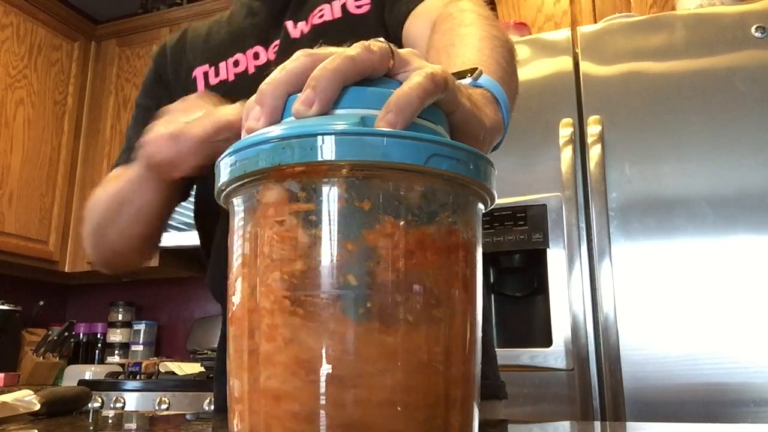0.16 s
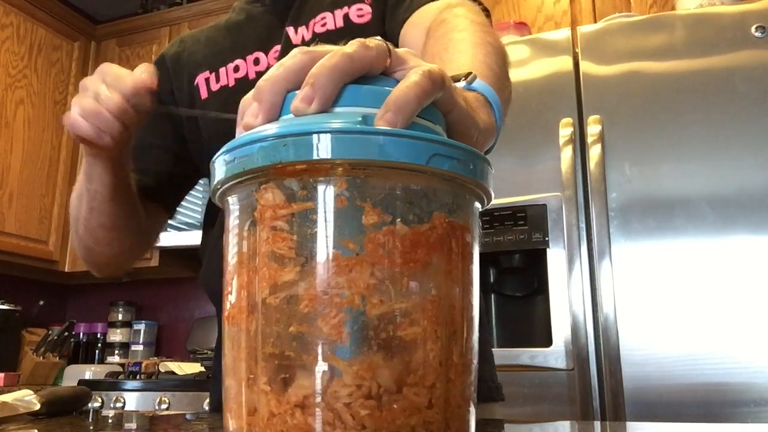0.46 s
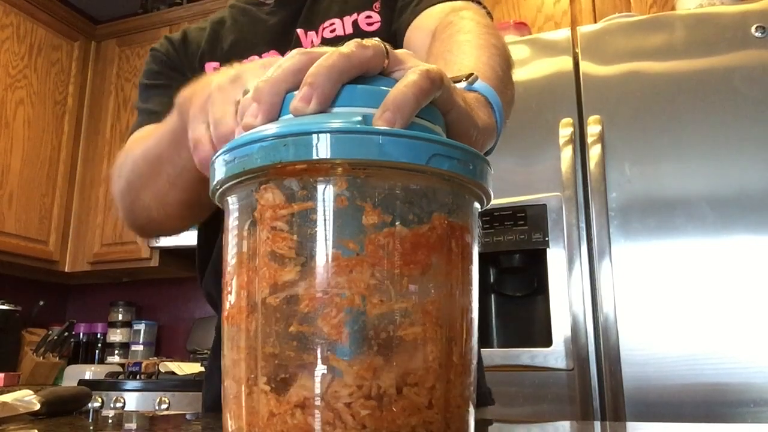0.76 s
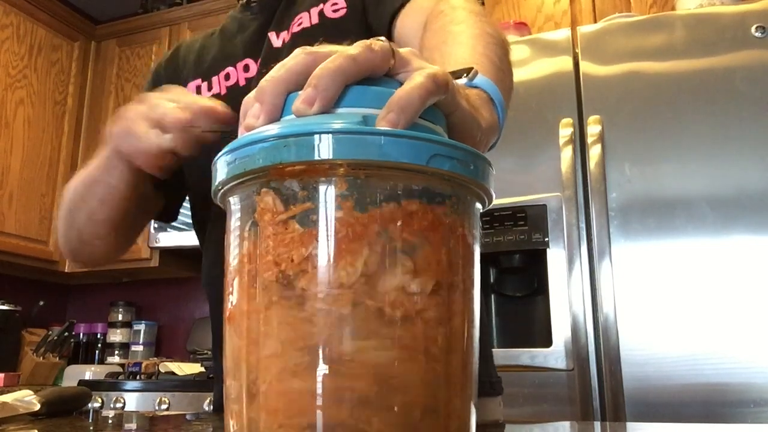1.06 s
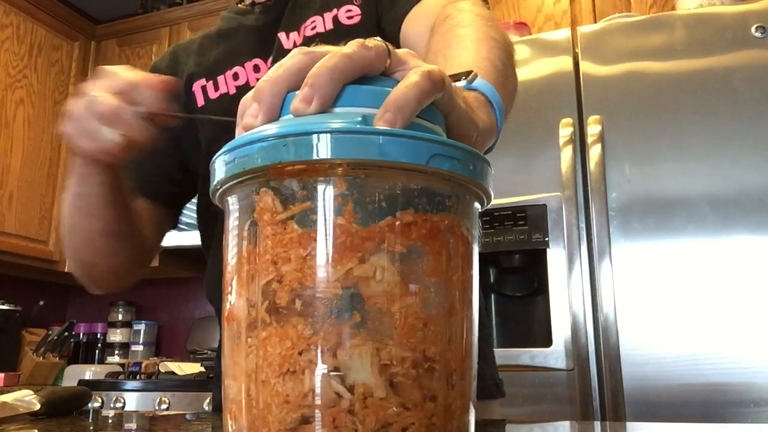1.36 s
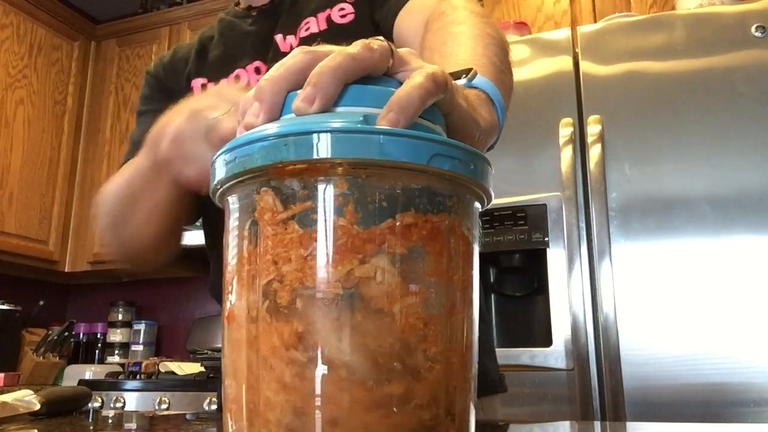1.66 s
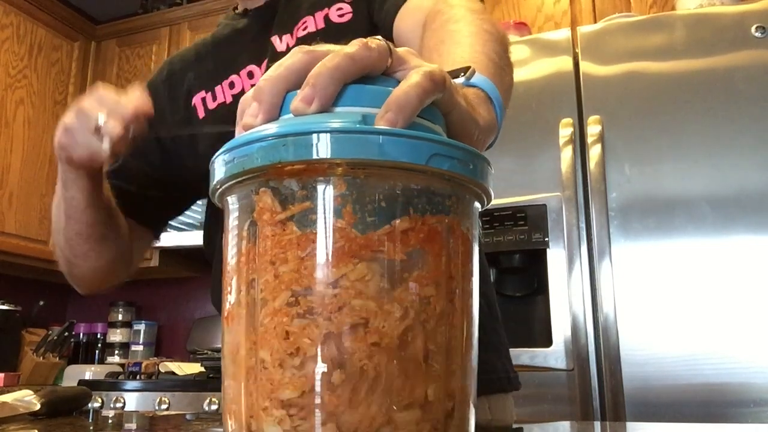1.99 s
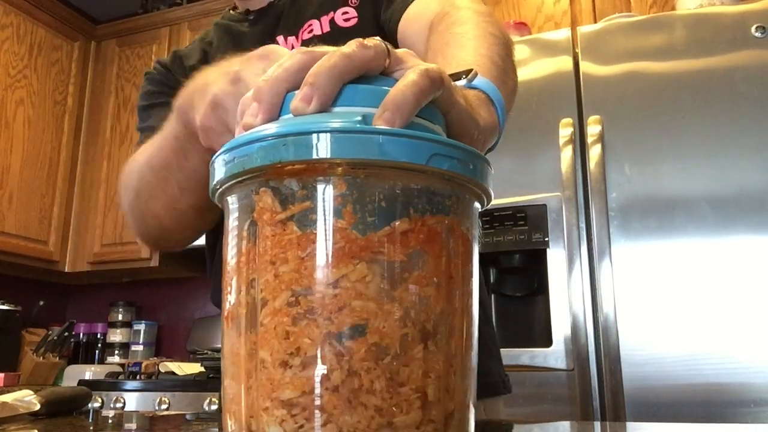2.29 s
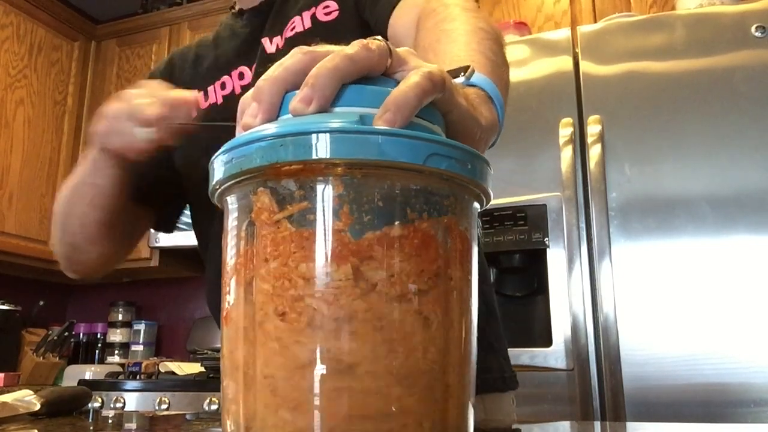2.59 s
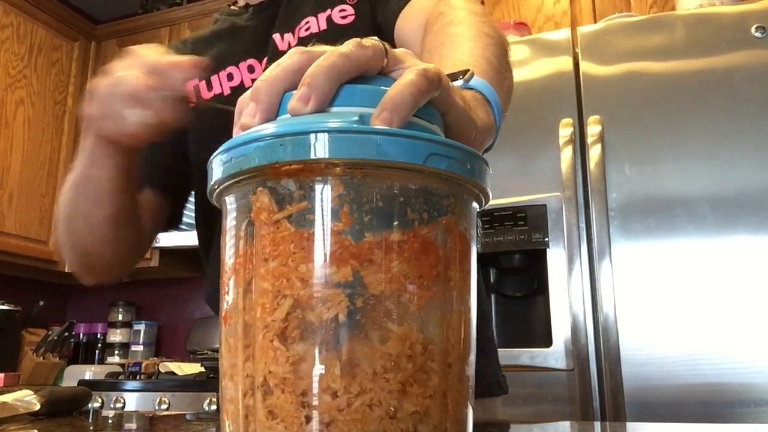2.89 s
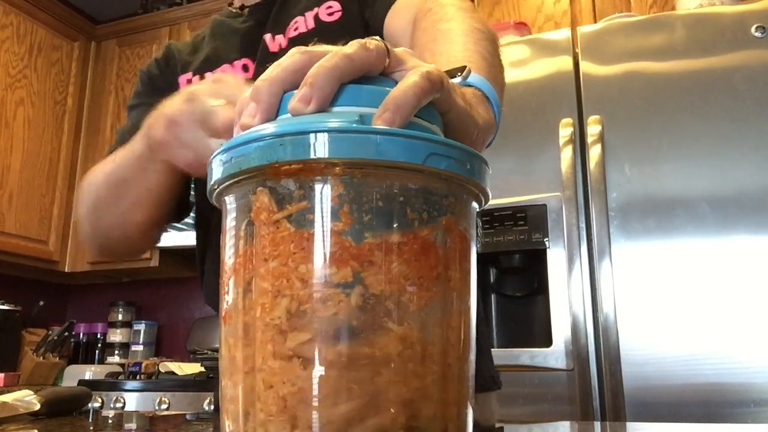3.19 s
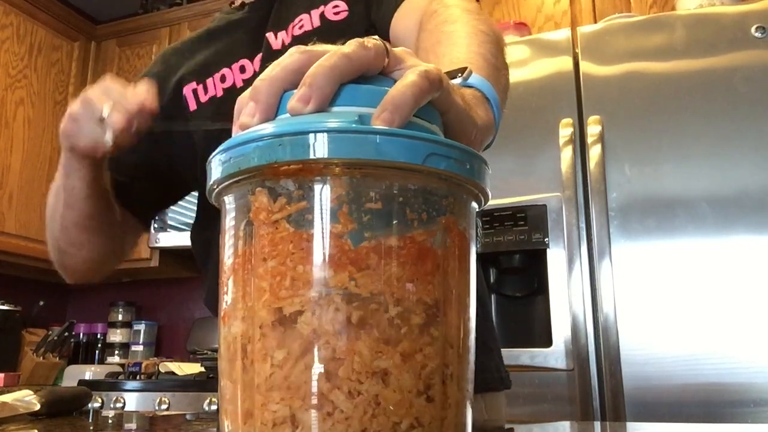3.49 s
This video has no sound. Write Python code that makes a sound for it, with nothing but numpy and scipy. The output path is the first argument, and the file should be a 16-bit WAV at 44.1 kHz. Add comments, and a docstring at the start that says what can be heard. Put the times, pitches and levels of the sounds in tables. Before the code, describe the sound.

A pull-cord food chopper, close to a phone microphone in a quiet kitchen. Pulls begin near 0.04, 0.9, 1.7, 2.4 and 3.2 seconds: a clutch snap, then gritty grinding swelling with crunches and dull thuds in the jar. Around 0.53, 1.36, 2.1, 2.86 and 3.6 the cord rewinds with hollow, bright lid rattling and sharp knocks; the last is cut short. A soft counter bump falls near 0.97.

```python
"""Pull-cord food chopper

A chopper on a kitchen counter, close to a phone microphone, over quiet room tone: five pulls and five returns.
Each pull: the clutch snaps in, gears grind and blades beat the food round the plastic jar, as random clicks
filtered by the jar. Each return: the spring rewinds the cord and the lid rattles and knocks, as chattering
noise that rings the lid. Once the jar bumps the counter, a short decaying sine."""
import sys
import numpy as np
from scipy import signal
from scipy.fft import rfft, irfft
from scipy.io import wavfile
from scipy.ndimage import uniform_filter1d

SR = 44100
rng = np.random.default_rng(int(sys.argv[2]) if len(sys.argv) > 2 else 0)


def int16_out(signal):
    """Quantize to a 16-bit WAV file."""
    q = np.round(np.clip(np.atleast_2d(signal).T, -1, 1) * 32767)
    wavfile.write(sys.argv[1], SR, q.astype(np.int16))


N = 160965  # length [samples]

# ringing of jar and lid; widths and lifts are base values that body() and lid() adapt:
# (frequency [Hz], width [Hz], lift while pulling [dB], lift while rattling [dB])
MODES = [(221, 45, 6.5, -3.5), (1060, 300, 5.5, 4.5), (1205, 260, 8.5, 3.5), (1694, 153, 4, 8),
         (1993, 91, 6, 8.5), (2555, 270, 3, 5), (3000, 97, 2.5, 5.5), (4580, 62, 5.5, 3),
         (5510, 450, 6.5, 8), (6160, 380, 3.5, 3.5), (6760, 140, 0, 7.5)]
CREST_DB = 12  # nominal peak of a chattering blow over its rms


def undb(db):
    """Decibels to amplitude ratio."""
    return 10 ** (np.asarray(db) / 20)


def unit(x):
    """Scale to an rms of 1."""
    return x / np.sqrt(np.mean(x ** 2))


def body(x, colour, lifts):
    """Causal minimum-phase filter with the given colour, raised at each mode; negative lifts count as none."""
    size = 8192
    half = size // 2
    hz = np.maximum(np.arange(half + 1) * SR / size, 1)
    colour_hz, colour_db = np.array(colour).T
    db = np.interp(np.log(hz), np.log(colour_hz), colour_db)
    for f, width, lift_db in lifts:
        db = db + max(lift_db, 0) / (1 + (2 * (hz - f) / max(width, 55)) ** 2)  # at least 55 Hz wide
    # folding the cepstrum forward in time makes the filter minimum-phase
    cepstrum = irfft(np.log(undb(db)))
    cepstrum[1:half] *= 2
    cepstrum[half + 1:] = 0
    impulse = irfft(np.exp(rfft(cepstrum)))[:half]
    return signal.fftconvolve(x, impulse)[:N]


def band(x, lo_hz, hi_hz):
    """Keep one frequency band."""
    return signal.sosfilt(signal.butter(2, [lo_hz, hi_hz], "bandpass", fs=SR, output="sos"), x)


def clicks(rate, spread_db, smooth):
    """Random clicks of uneven size, at a mean rate per second, over a share of smooth rubbing."""
    chance, size = rng.random(N), rng.exponential(size=N)
    sign_noise, rubbing = rng.standard_normal((2, N))
    hits = (chance < rate / SR) * undb(spread_db * np.minimum(size, 3)) * np.sign(sign_noise)
    return unit(unit(hits) + smooth * rubbing)


def flutter(rate, depth_db):
    """Quick uneven swelling: random steps in dB at the given rate per second, smoothed into a gain."""
    k = max(int(SR / rate), 1)
    steps = np.repeat(np.clip(rng.standard_normal(N // 50), -2, 2), k)[:N]
    return unit(undb(depth_db * uniform_filter1d(steps, k)))


def patchy(x, rate, depth_db):
    """The colour shifts from grain to grain: frequency bands swell apart from each other."""
    edges = [30, 300, 700, 1500, 3000, 4500, 6200, 8000, 19000]  # Hz
    total = 0
    for k, (lo_hz, hi_hz) in enumerate(zip(edges[:-1], edges[1:])):
        total = total + (-1) ** k * band(x, lo_hz, hi_hz) * flutter(rate, depth_db)
    return unit(total)


def ticking():
    """Gain of many small loose ticks, each quickly swelling and dying, over steady rubbing."""
    ticks_per_s, tail_s, spread_db, rub_share = 280, .0007, 4.5, .65
    chance, size = rng.random(N), rng.standard_normal(N)
    hits = (chance < ticks_per_s / SR) * undb(spread_db * np.clip(size, -2, 2))
    fade = np.exp(-1 / (tail_s * SR))
    ticks = signal.lfilter([1], [1, -2 * fade, fade ** 2], hits)
    return unit(unit(ticks) + rub_share)


def curve(tables, column):
    """Gain over time from several stretches, silent between them, with 8 ms fades outside their ends."""
    t, out = np.arange(N) / SR, np.zeros(N)
    for rows in tables:
        rows = np.array(rows)
        edge = np.clip(np.minimum(t - rows[0, 0], rows[-1, 0] - t) / .008 + 1, 0, 1)
        out += edge * undb(np.interp(t, rows[:, 0], rows[:, column]))
    return out


def bursts(rows, length, rise_s, tail_s):
    """Gain of blows (time [s], level [dB]): each rises, holds for its length [s], then dies away."""
    t, out = np.arange(N) / SR, np.zeros(N)
    for (s, db), hold in zip(rows, np.broadcast_to(length, len(rows))):
        i = int(s * SR)
        dt = t[i:i + 4000] - s
        rise = np.clip(dt / rise_s, 0, 1)
        decay = np.exp(-np.maximum(dt - rise_s - hold, 0) / tail_s)
        out[i:i + 4000] += undb(db) * rise * decay
    return out


def room_tone():
    """Steady background of the kitchen: noise filtered to the colour of the room."""
    # shape of the room tone: (frequency [Hz], level [dB])
    tone_colour = [(18, -30), (40, -17.5), (102, -3.5), (463, -8.5), (702, -14.5), (1990, -20), (6000, -31),
                   (9000, -40), (15200, -59)]
    level_db = -38  # rms ahead of the microphone
    return undb(level_db) * unit(body(rng.standard_normal(N), tone_colour, []))


def room_echo(near):
    """Reflections of the kitchen: band-limited noise dying exponentially, starting after 4 ms."""
    level_db, t60_s, low_hz, damp_hz = -17, .25, 126, 4560
    t = np.arange(SR // 2) / SR
    tail = rng.standard_normal(len(t)) * undb(-60 * t / t60_s) * (t > .004)
    tail = band(tail, low_hz, damp_hz)
    wet = signal.fftconvolve(near, tail / np.sqrt(np.sum(tail ** 2)))[:N]
    return undb(level_db) * wet


def bumps():
    """The jar bumps the counter: a short dull thump, a low sine that swells and dies."""
    # bumps, levels ahead of the scaling below: (time [s], level [dB])
    bump_rows = [(0.9674, -10)]
    pitch_hz, swell_s = 161, 0.002
    t, out = np.arange(N) / SR, np.zeros(N)
    for s, db in bump_rows:
        age = np.maximum(t - s, 0) / swell_s
        out += undb(db) * 2.2 * age * np.exp(-age) * np.sin(2 * np.pi * pitch_hz * (t - s))
    return out


def lid(hollow, bright, colour, lifts, favour):
    """The lid rings: a hollow lower part, and a bright upper part whose modes depend on the spot struck."""
    split_hz, top_hz, spots_per_s = 2500, 19000, 110

    def low(x):
        return band(body(x, colour, lifts), 55, split_hz)

    def high(x, modes):
        return -band(body(x, colour, modes), split_hz, top_hz)

    # the struck spot wanders among three
    spots = np.array([flutter(spots_per_s, 8) for _ in range(3)])
    spots = spots / np.sum(spots, axis=0)
    even = rng.standard_normal(N)  # plain noise, sets the level of each part
    upper = 0
    for k, spot in enumerate(spots):
        # each spot scales the lift of every third mode by favour and divides the others by it
        modes = [(f, 2 * width, db * (favour if j % 3 == k else 1 / favour))
                 for j, (f, width, db) in enumerate(lifts)]
        upper = upper + high(bright * spot, modes)
    return low(hollow) / np.std(low(even)) + upper / np.std(high(even, lifts))


def blows(rows, length, rise_s, tail_s, lead_s, linger):
    """Chatter driving the hollow and bright parts of the lid; the hollow part swells in earlier by lead_s."""
    rows = np.array(rows)
    chatter = undb(-CREST_DB) * patchy(clicks(3000, 0.78, 0.78), 300, 6.0)
    hollow = np.c_[rows[:, 0] - lead_s, rows[:, 1] + rows[:, 2]]
    hollow_gain = bursts(hollow, length, rise_s + lead_s, tail_s * linger)
    bright_gain = bursts(rows[:, :2], length, rise_s, tail_s)
    return chatter * hollow_gain, chatter * bright_gain


def rewind():
    """The spool rattles, scrapes and knocks while the cord runs back, and the lid rings with it."""
    # one table per return of the cord: (time [s], hollow rattle of the lid [dB], bright rattle [dB])
    returns = [
        [(0.537, -30, -33), (0.692, -27.5, -26), (0.79, -37, -36.5), (0.905, -41, -48)],
        [(1.36, -27.5, -42.5), (1.496, -25, -22.5), (1.598, -32.5, -36.5), (1.685, -70, -51)],
        [(2.087, -30.5, -42), (2.209, -24, -23), (2.327, -30, -32.5), (2.43, -56, -41)],
        [(2.862, -28.5, -37), (3.01, -21.5, -25.5), (3.11, -32, -32.5), (3.19, -42, -51)],
        [(3.594, -26, -28), (3.65, -25.5, -26)],
    ]
    # knocks of the rewinding spool: (time [s], nominal peak [dB], hollow part re that peak [dB])
    knocks = [(0.5323, -5.5, -8), (0.5395, -15, -27), (0.562, -13, 2), (0.592, -7.5, 1), (0.618, -19, 9),
              (0.627, -5.5, 8), (0.6337, -10, -1), (0.648, -9, -6), (0.714, -12, 1), (0.7376, 1, -12),
              (0.7547, -14, 7.5), (0.7791, -9, -11), (0.8003, -7, -27), (0.862, -32, 3), (1.3583, -23, 9),
              (1.3786, -7.5, -14), (1.392, -12, -8), (1.4444, -12.5, 9.5), (1.4526, 0.5, -3),
              (1.488, -4.5, -17), (1.506, -20.5, 6.5), (1.5535, -1.5, -11), (1.6108, -8, -8.5),
              (1.6205, -15.5, 4), (2.1077, -5, -4), (2.118, -3.5, -13), (2.159, -11, 12), (2.1926, -11, 1),
              (2.2224, -7.5, -19), (2.2283, -23, -15), (2.265, -12, 0), (2.3375, -21, 1),
              (2.3625, -13.5, 0), (2.375, -14.5, -4), (2.4021, -22, -2), (2.8605, -6, -20),
              (2.8983, -26, 4), (2.9208, -10.5, -1), (2.9461, -12.5, 10), (2.9606, -3, -11),
              (2.9892, -5, -10), (3.0644, -5.5, -10), (3.112, -8.5, -1), (3.5932, -14, -17)]
    # colour of the lid: (frequency [Hz], level [dB])
    lid_colour = [(35, -32), (100, -14.5), (341, 3.5), (667, -11), (1250, -1), (1550, -11.5), (2030, -6),
                  (2800, -12), (6900, -13.5), (7300, -16.5), (10000, -19.5), (15200, -34.5)]
    knock_s, rise_s, tail_s = 0.00027, 0.00056, 0.0042
    hollow_lead_s, hollow_linger = 0.0072, 0.96  # linger multiplies the tail of the hollow part

    low_rattle = clicks(3500, 3.1, 0.72) * ticking() ** 0.64 * flutter(39.38, 1.53)
    low_rattle = patchy(low_rattle, 120, 2.9)
    high_rattle = clicks(3500, 2.9, 1.0) * ticking() * flutter(50, 1.13)
    high_rattle = patchy(high_rattle, 160, 0.88)
    hollow, bright = blows(knocks, knock_s, rise_s, tail_s, hollow_lead_s, hollow_linger)
    hollow = hollow + curve(returns, 1) * low_rattle
    bright = bright + curve(returns, 2) * high_rattle
    return lid(hollow, bright, lid_colour, np.array(MODES)[:, [0, 1, 3]], favour=1.7)


def clutch():
    """A hard snap as each pull takes hold: a burst of chatter ringing through the lid."""
    # clutch snapping in: (time [s], nominal peak [dB], hollow part re that peak [dB], length [s])
    snaps = [(0.035, -10.5, 1.5, 0.0056), (0.909, -10.5, 3, 0.0082), (1.6866, -4, 1, 0.0039),
             (2.4334, -9.5, 1.5, 0.0078), (3.194, -17.5, 12, 0.005)]
    # colour of the snap: (frequency [Hz], level [dB])
    snap_colour = [(100, -4.5), (400, -8), (900, -1.5), (2000, -3), (3500, -10.5), (6400, -7.5),
                   (9500, -22.5), (15200, -27.5)]
    # ringing of the snap, base values that lid() adapts: (frequency [Hz], width [Hz], lift [dB])
    snap_modes = [(1720, 170, 6), (6400, 300, 5), (8540, 170, 12)]
    hollow, bright = blows(snaps, np.array(snaps)[:, 3], rise_s=0.0035, tail_s=.0035, lead_s=0, linger=1)
    return lid(hollow, bright, snap_colour, snap_modes, favour=0.44)


def jar(x):
    """The plastic jar colours and rings with whatever works inside it."""
    # colour of the jar while pulling: (frequency [Hz], level [dB])
    pull_colour = [(18, -66), (35, -14.5), (229, -6.5), (400, 1), (667, -11.5), (1120, -18.5),
                   (2040, -12.5), (4960, -23), (6270, -20.5), (10000, -29.5), (15200, -42)]
    return body(x, pull_colour, np.array(MODES)[:, [0, 1, 2]])


def chops():
    """Blades chopping into a lump: short bursts of crunching clicks through the jar."""
    # chops: (time [s], nominal peak [dB])
    chop_rows = [(0.079, -7), (0.116, -3.5), (0.178, 0.5), (0.223, -5.5), (0.311, -6), (0.982, -29),
                 (1.104, -9), (1.17, 1), (1.732, -16), (1.781, 0), (2.488, -9), (2.506, -3.5), (2.643, 0),
                 (2.769, -12), (3.246, -10.5), (3.269, -5)]
    crunch = clicks(4000, 2.4, 0.47)
    struck = crunch * bursts(chop_rows, length=0.0046, rise_s=0.0011, tail_s=0.0011)
    return jar(struck) / np.std(jar(crunch)) * undb(-CREST_DB)


def pulls():
    """Blade thuds, gear teeth and cord hiss, all sounding through the jar under one fluttering load, with the
    chops added through the jar."""
    # one table per pull: (time [s], blades thudding in the food [dB], gear grind [dB], cord and gear hiss [dB])
    pull_rows = [
        [(0.055, -32, -33, -36), (0.145, -23.5, -18, -25.5), (0.309, -17, -19.5, -25.5),
         (0.371, -24, -23, -29.5), (0.52, -59, -48, -52.5)],
        [(0.935, -30, -34, -37), (0.985, -27, -27.5, -28), (1.223, -20.5, -19.5, -26), (1.323, -43, -51, -47.5),
         (1.35, -58, -59, -82)],
        [(1.71, -32, -31, -31), (1.886, -16.5, -15.5, -23.5), (1.998, -25, -27, -32), (2.026, -42, -73, -42),
         (2.08, -67, -59, -70)],
        [(2.46, -37, -48, -38), (2.522, -23, -23.5, -25), (2.718, -20, -17.5, -25.5), (2.8, -34, -49, -42.5),
         (2.85, -57, -47, -75)],
        [(3.215, -36, -39, -39), (3.361, -12.5, -17, -20), (3.485, -21.5, -25.5, -31), (3.533, -51, -61, -42),
         (3.58, -54, -37, -79)],
    ]
    low_split_hz, high_split_hz, top_hz = 700, 3500, 19000
    load = flutter(45, 1.6)

    thud = jar(patchy(clicks(600, 3.05, 0.59) * load, 60, 0.88))
    thud = unit(band(thud, 28, low_split_hz))

    teeth = jar(patchy(clicks(1200, 9.3, 0.98) * load * ticking() ** 0.21, 200, 3.5))
    grind = unit(band(teeth, low_split_hz, high_split_hz))

    hiss = jar(clicks(3000, 2.1, 0.7) * load ** 0.23 * ticking() ** 0.21)
    hiss = unit(band(hiss + 0.16 * teeth, high_split_hz, top_hz))

    thud_gain, grind_gain, hiss_gain = [curve(pull_rows, column) for column in (1, 2, 3)]
    return thud_gain * thud - grind_gain * grind + hiss_gain * hiss + chops()


def scene():
    """The chopper up close, its reflections in the kitchen, and the room tone."""
    near = pulls() + rewind() + clutch() + bumps()
    return (near + room_echo(near) + room_tone())[None]


def record(dry):
    """The phone microphone dips near 10 kHz and rises above; a steep low-pass cuts the top."""
    # response of the microphone: (frequency [Hz], level [dB])
    mic = [(20, -4.5), (9800, -4.5), (10400, -10.5), (11500, -5.5), (13300, 5.5), (15200, 12)]
    top_hz = 15250
    low_pass = signal.ellip(12, .3, 90, top_hz, fs=SR, output="sos")
    return signal.sosfilt(low_pass, body(dry[0], mic, []))[None]


dry = scene()
out = record(dry)
int16_out(out)
```